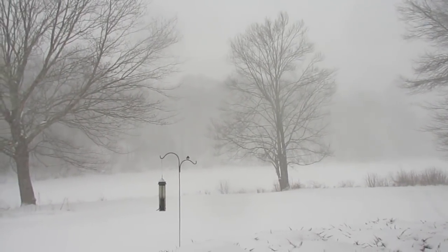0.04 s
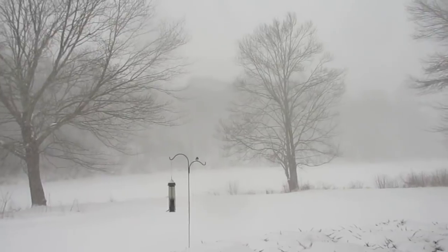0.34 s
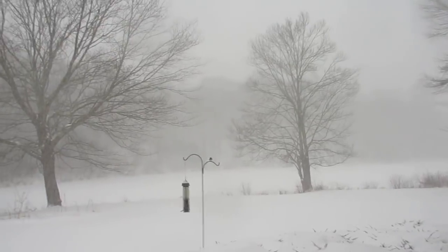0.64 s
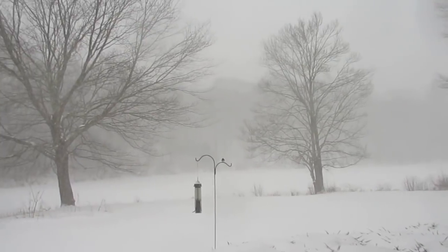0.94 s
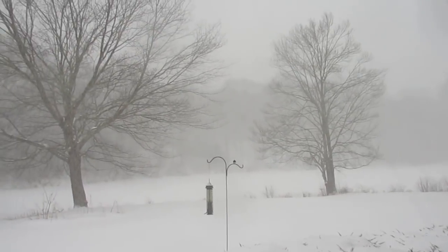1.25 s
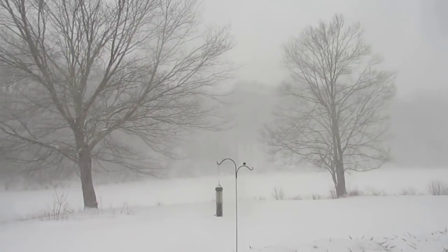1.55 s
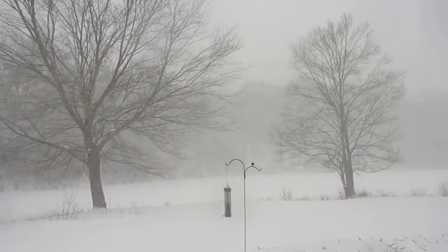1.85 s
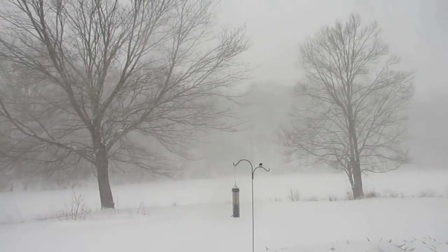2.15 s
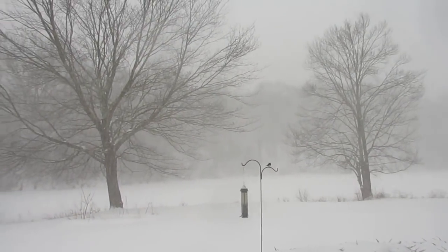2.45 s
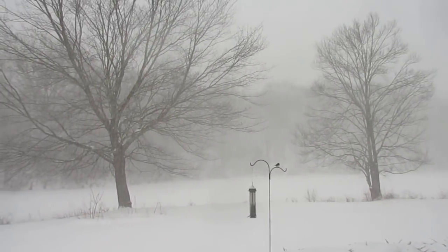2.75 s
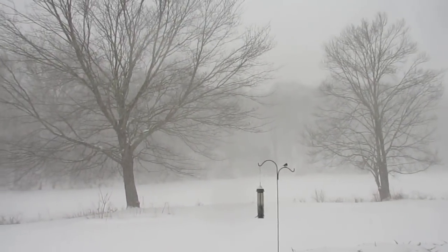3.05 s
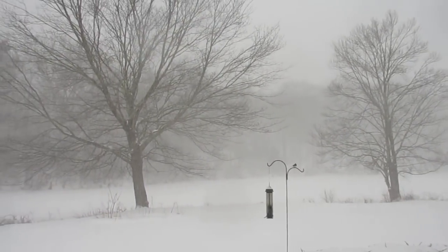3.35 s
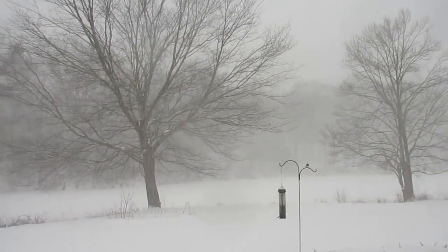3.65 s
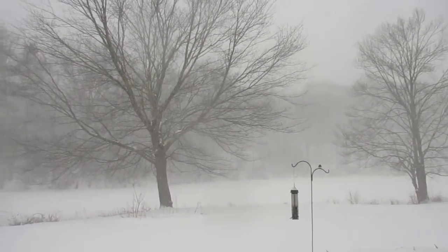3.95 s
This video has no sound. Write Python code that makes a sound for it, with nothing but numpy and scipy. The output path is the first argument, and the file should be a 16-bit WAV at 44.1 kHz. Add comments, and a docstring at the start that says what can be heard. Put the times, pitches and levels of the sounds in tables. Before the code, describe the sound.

Winter wind roars steadily through bare trees, with sleet ticks and gusts buffeting the microphone.

```python
"""A steady roar of winter wind in bare trees, heard from a hand-held camera out in the storm.
Sleet ticks on and around the camera, and midway gusts buffet the microphone with rumble and thumps.
A small bird calls twice, first faintly, then more clearly; a very faint tone lies under it all.
Near the end a finger slips on the case with a squeak and knocks it."""
import sys
import numpy as np
from scipy import signal
from scipy.fft import rfft, irfft
from scipy.io import wavfile
from scipy.ndimage import uniform_filter1d

SR = 44100
rng = np.random.default_rng(int(sys.argv[2]) if len(sys.argv) > 2 else 0)


def output_pcm(signal):
    """Save a mono or channel-first signal as 16-bit PCM at the path in sys.argv[1].

    Samples are clipped to [-1, 1] before scaling.
    """
    pcm = np.clip(np.atleast_2d(signal).T, -1, 1) * 32767
    wavfile.write(sys.argv[1], SR, np.round(pcm).astype(np.int16))


N = 176400
T = np.arange(N) / SR


def amp(db):
    """Decibels to gain."""
    return 10 ** (np.asarray(db) / 20)


def unit(x):
    """Scales to rms 1."""
    return x / np.sqrt(np.mean(x ** 2) + 1e-20)


def level(points):
    """A curve of (s, dB) as a gain for every sample."""
    return amp(np.interp(T, *np.transpose(points)))


def spectrum_db(hz, points):
    """Reads a spectrum of (Hz, dB) along a logarithmic frequency axis."""
    point_hz, db = np.transpose(points)
    return np.interp(np.log(hz + 1), np.log(point_hz + 1), db)


def colour(x, points):
    """Filters by a spectrum of (Hz, dB) and scales to rms 1."""
    hz = np.fft.rfftfreq(len(x), 1 / SR)
    return unit(irfft(rfft(x) * amp(spectrum_db(hz, points)), len(x)))


def add(mix, start, sound):
    """Mixes a sound in at a start time in seconds."""
    part = mix[max(round(start * SR), 0):][:len(sound)]
    part += sound[:len(part)]


def noise(size):
    """White noise."""
    return rng.standard_normal(size)


def push(t, width, rebound, roundness=2):
    """A pressure pulse inside a wider, opposite rebound of equal area."""
    core = np.exp(-abs(t / width) ** roundness)
    back = np.exp(-(t / rebound) ** 2)
    return core - back * core.sum() / back.sum()


def whine(hz=1896, db=-65):
    """A very faint steady tone at the back of the scene."""
    return amp(db) * np.sin(2 * np.pi * hz * T)


# The tick of a sleet grain, near or far. Each row: frequency in Hz, relative level in dB.
TICK_SPECTRUM = [(400, -28), (1800, -4), (3300, 6), (5000, 3.5), (8000, 2.5), (12500, 1.5), (15000, -2.5)]
# Fine sleet farther from the microphone. Each row: time in seconds, level in dB.
PATTER_LEVEL = [(0, -64), (.55, -63), (1.1, -59.5), (1.45, -60.5), (1.9, -56), (2.25, -62), (2.7, -58),
                (3.2, -58.5), (3.5, -55.5), (3.7, -57.5), (3.9, -53.5), (4, -51)]

def far_sleet(grains_per_s=260, spread_db=2.5, decay_s=0.0016):
    """Many tiny grains land at random around the camera, each a brief burst of noise."""
    landings = rng.random(N) < grains_per_s / SR
    strength = amp(spread_db * np.minimum(rng.exponential(1, N), 4))
    envelope = signal.lfilter([1], [1, -np.exp(-1 / (decay_s * SR))], landings * strength)
    return colour(envelope * noise(N), TICK_SPECTRUM) * level(PATTER_LEVEL)


# A small bird out in the storm: one faint note, later a quick cluster. Each row: start in seconds,
# length in seconds, first and last pitch in Hz, level in dB, rasp as rms pitch jitter in Hz.
BIRD_NOTES = [(0.82, .06, 6480, 6900, -58, 100), (2.99, .015, 2980, 5100, -47.5, 600),
              (3.001, 0.019, 3310, 6630, -39, 300), (3.0175, .008, 6740, 4430, -44, 500),
              (3.023, .013, 5880, 6400, -45, 400), (3.03, .008, 6360, 3700, -51, 500)]

def bird(glide_ease=2.31, echo_db=-5, echo_s=0.01):
    """Thin, raspy glides reach the microphone with a little scatter from the surroundings."""
    out = np.zeros(N)
    for start, length, from_hz, to_hz, db, rasp_hz in BIRD_NOTES:
        progress = np.arange(0, length, 1 / SR) / length
        glide = to_hz + (from_hz - to_hz) * abs(1 - progress) ** glide_ease
        rasp = rasp_hz * unit(uniform_filter1d(noise(len(progress)), size=20))
        envelope = np.sqrt(abs(np.sin(np.pi * progress)))
        add(out, start, amp(db) * envelope * np.sin(2 * np.pi * np.cumsum(glide + rasp) / SR))
    tail = noise(4096) * np.exp(-T[:4096] / echo_s)
    return out + amp(echo_db) * signal.fftconvolve(out, tail / np.linalg.norm(tail))[:N]


# Grains landing on and right beside the camera. Each row: start in seconds, level in dB,
# ring pitch in Hz, decay of the shatter in seconds, gain of the ring relative to the shatter.
NEAR_GRAINS = [(.2825, -41, 7440, .0015, .2), (.535, -42.5, 6000, 0.0014, .2), (.552, -41, 3020, .0015, .8),
               (0.5814, -45, 4020, .002, .5), (.634, -35, 8500, 0.0013, .5),
               (.818, -39, 11700, .0015, 0.54), (.8326, -41, 8200, .001, .7),
               (.9812, -43, 6600, 0.0017, 0.33), (1.316, -41, 5800, .002, .3),
               (1.406, -41, 11000, 0.0016, .2), (1.463, -42, 9000, 0.0022, .2),
               (1.479, -49.5, 2320, 0.0016, 4), (1.5308, -40, 10400, .002, .3),
               (1.638, -42, 9900, .0012, 0.87), (1.748, -42, 8000, .0015, .2),
               (1.8075, -33, 6400, .0008, .3), (1.887, -33.5, 9800, 0.0009, .4),
               (1.887, -52, 5100, 0.0018, 3), (1.9147, -39.5, 6100, 0.0011, 1.4),
               (2.424, -40, 5400, 0.0012, 0.71), (2.5072, -39.5, 4900, 0.0013, 0.92),
               (2.5177, -41, 4400, .002, .4), (2.522, -38, 5500, .0015, .3),
               (2.5612, -33.5, 12000, 0.003, 0.7), (2.6972, -36, 4800, 0.0018, 0.55),
               (2.766, -44, 6300, 0.0022, .2), (2.8672, -41, 6460, .0015, 1),
               (3.0114, -38.5, 8500, .0015, .2), (3.0606, -35, 6000, 0.0035, 0.49),
               (3.395, -36, 8900, .0008, .8), (3.414, -38, 8500, 0.0018, 1.1),
               (3.4645, -40, 4970, 0.0025, .2), (3.523, -35.5, 8300, .0015, 0.44),
               (3.5269, -38.5, 6360, 0.0022, .8), (3.692, -34.5, 13100, 0.0012, 0.55),
               (3.7554, -40, 8100, .0012, 0.86), (3.8123, -38, 9000, .0012, .2),
               (3.819, -35.5, 11800, 0.0015, .3), (3.8684, -41, 6140, 0.0024, .3),
               (3.956, -46, 13000, .002, .5)]

def near_sleet(rise_s=0.00025, ring_stretch=1.15, focus_db_per_octave=3.5):
    """Each grain shatters in a few milliseconds, loudest around the pitch of the spot that it rings."""
    out, t = np.zeros(N), np.arange(1024) / SR
    for start, db, ring_hz, decay, ring_gain in NEAR_GRAINS:
        spectrum = [(hz, band_db - focus_db_per_octave * abs(np.log2(hz / ring_hz)))
                    for hz, band_db in TICK_SPECTRUM]
        shatter = colour(noise(len(t)), spectrum) * np.exp(-t / decay)
        ring = ring_gain * np.sin(2 * np.pi * ring_hz * t) * np.exp(-t / (ring_stretch * decay))
        attack = np.minimum(t / rise_s, 1) * np.exp(rise_s / decay)  # makes up for decay during the rise
        add(out, start, amp(db) * (shatter + ring) * attack)
    return out


# Skin scraping the camera's case. Each row: frequency in Hz, relative level in dB.
SCRAPE_SPECTRUM = [(400, -22), (1200, -2), (3100, 12.5), (3800, -5), (5000, 3.5), (9000, -1.5), (12500, 3),
                   (15000, -9)]
# Slips close to the microphone. Each row: start in seconds, length in seconds,
# the squeak's first pitch and the pitch it falls toward in Hz, squeak and scrape levels in dB.
FINGER_SLIPS = [(3.3543, .0195, 3320, 1007, -30.5, -33), (3.4046, 0.0045, 1740, 1110, -38, -59)]

def finger_slips(attack_s=0.00078, fall_s=0.00418, scrape_s=0.013, waver=0.08, rough=0.4):
    """A short scrape on the case, whose uneven squeak drops in pitch as the finger stops."""
    out = np.zeros(N)
    for start, length, from_hz, to_hz, squeak_db, scrape_db in FINGER_SLIPS:
        t = np.arange(0, length, 1 / SR)
        progress = t / length
        wobble, grip = (unit(signal.detrend(uniform_filter1d(noise(len(t)), size=24))) for _ in range(2))
        hz = (to_hz + (from_hz - to_hz) * np.exp(-t / fall_s)) * (1 + waver * wobble)
        swell = (0.36 + 2 * progress ** 2) * (1 - progress ** 10)  # grows, then cuts off
        squeak = np.sin(2 * np.pi * np.cumsum(hz) / SR) * swell * (1 + rough * grip)
        scrape = colour(noise(len(t)), SCRAPE_SPECTRUM) * np.exp(-(t / scrape_s) ** 4)
        attack = np.minimum(t / attack_s, 1)
        add(out, start, (amp(squeak_db) * squeak + amp(scrape_db) * scrape) * attack)
    return out


# The click of the camera's case. Each row: frequency in Hz, relative level in dB.
CASE_SPECTRUM = [(400, -23), (1000, -13), (1900, 7.5), (3200, -1.5), (4200, 2), (4800, -4), (5700, 3.5),
                 (6800, -4), (7800, 4.5), (8800, -6.5), (10500, -1.5), (11900, -1), (13500, -6),
                 (15000, -4.5)]
# Knocks on the body that holds the microphone. Each row: time in seconds, the push's level in dB,
# half width in seconds and roundness (1 pointed, 2 smooth) before the fingertip softens it,
# clack level in dB, click level in dB, half length of the click in seconds.
CASE_KNOCKS = [(3.4123, -2, .00062, 1.44, -15.5, -25.5, 0.0019),
               (3.7944, -6, 0.00068, 1.67, -32.5, -24.5, 0.00084), (3.8263, -14, .001, 2, -50, -51, .001)]

def finger_knocks(soft_hz=1900, rebound_s=0.0054, clack_hz=1100, clack_s=0.00062):
    """A blunt push of a soft fingertip: the camera body flexes with a dead clack, and the case clicks."""
    out, t = np.zeros(N), np.arange(-0.02, 0.02, 1 / SR)
    fingertip = signal.butter(3, soft_hz, fs=SR, output="sos")
    clack = np.cos(2 * np.pi * clack_hz * t) * np.exp(-(t / clack_s) ** 2)
    for time, db, width, roundness, clack_db, click_db, click_s in CASE_KNOCKS:
        click = colour(noise(len(t)), CASE_SPECTRUM) * np.exp(-(t / click_s) ** 4)
        thud = signal.sosfiltfilt(fingertip, push(t, width, rebound_s, roundness))
        add(out, time + t[0], amp(click_db) * click - amp(db) * thud - amp(clack_db) * clack)
    return out


# Turbulence right at the microphone. Each row: frequency in Hz, relative level in dB.
RUMBLE_SPECTRUM = [(10, -9), (28, 2.5), (60, 4), (115, -1), (170, -8), (260, -19), (500, -41), (1500, -76),
                   (8000, -90)]
# The gusts that drive that rumble. Each row: time in seconds, level in dB.
GUST_LEVEL = [(0, -57), (1.24, -63), (1.3, -44), (1.45, -40), (1.53, -48), (1.76, -51), (1.84, -37),
              (1.93, -33.5), (1.98, -37.5), (2.14, -34.5), (2.21, -40.5), (2.31, -46), (2.39, -38.5),
              (2.47, -42.5), (2.57, -42), (2.65, -59), (4, -53)]
# Single eddies crossing the microphone.
# Each row: time in seconds, level in dB, half width in seconds, sign of the pressure.
MIC_EDDIES = [(1.834, -18, 0.0019, -1), (1.911, -17, .002, 1), (1.941, -19.5, 0.0015, 1),
              (2.139, -32, 0.001, 1), (2.386, -27, 0.0059, -1), (2.523, -21, 0.0033, -1),
              (2.562, -18.5, 0.002, -1), (2.581, -26, 0.0037, -1)]

def buffeting(rebound_ratio=6):
    """Gusts rumble on the microphone; the strongest eddies thump singly."""
    out = colour(noise(N), RUMBLE_SPECTRUM) * level(GUST_LEVEL)
    t = np.arange(-0.04, 0.04, 1 / SR)
    for time, db, width, sign in MIC_EDDIES:
        add(out, time + t[0], np.sign(sign) * amp(db) * push(t, width, rebound_ratio * width))
    return out


# Wind in the bare trees around the camera. Each row: frequency in Hz, relative level in dB.
ROAR_SPECTRUM = [(12, -30), (22, -6), (62, -7), (100, -8.5), (145, -10), (195, -2.5), (245, 0.5), (290, -5),
                 (340, -14), (400, -5.5), (455, -6), (545, -9.5), (630, -11.5), (820, -17), (930, -14.5),
                 (1030, -19), (1140, -17), (1320, -19), (2000, -23), (3200, -26.5), (4500, -32),
                 (7000, -35), (10000, -37), (13000, -41), (15000, -47)]
# Drift of the roar's hollow band, taken relative to its mean. Each row: time in seconds, pitch in Hz.
HOLLOW_PITCH = [(0, 235), (.7, 245), (1.3, 232), (2, 233), (2.8, 221), (4, 228)]
# Strength of the roar where the camera stands. Each row: time in seconds, level in dB.
ROAR_LEVEL = [(0, -39.5), (.65, -39.5), (1.2, -40), (2, -40.5), (2.8, -40), (3.4, -40.5), (4, -41)]

def wind_in_trees(patchy_db=0.7, drift_below_hz=700):
    """The roar of wind in branches swells in small patches; its hollow low bands drift in pitch."""
    hz, t, bands = signal.stft(noise(N), SR, nperseg=2048)
    hz = hz[:, None]
    drift = np.interp(t, *np.transpose(HOLLOW_PITCH)) / np.mean(HOLLOW_PITCH, axis=0)[1]
    pitch_ratio = 1 + (drift - 1) / (1 + (hz / drift_below_hz) ** 4)
    patches = uniform_filter1d(noise(bands.shape), size=20, axis=0)  # smooth across frequency
    patches = unit(uniform_filter1d(patches, size=4, axis=1))  # and across time
    gain = amp(spectrum_db(hz / pitch_ratio, ROAR_SPECTRUM) + patchy_db * patches)
    roar = signal.istft(bands * gain, nperseg=2048)[1][:N]
    return unit(roar) * level(ROAR_LEVEL)


def scene():
    """Storm, sleet, handling and bird at one hand-held microphone."""
    storm = wind_in_trees() + buffeting() + near_sleet() + far_sleet()
    return (storm + finger_knocks() + finger_slips() + bird() + whine())[None]


def record(dry):
    """The camera cuts off the highest treble."""
    band_limit = signal.firwin(401, cutoff=15200, window=("kaiser", 8), fs=SR)
    return signal.oaconvolve(dry, band_limit[None], "same")


dry = scene()
out = record(dry)
output_pcm(out)
```